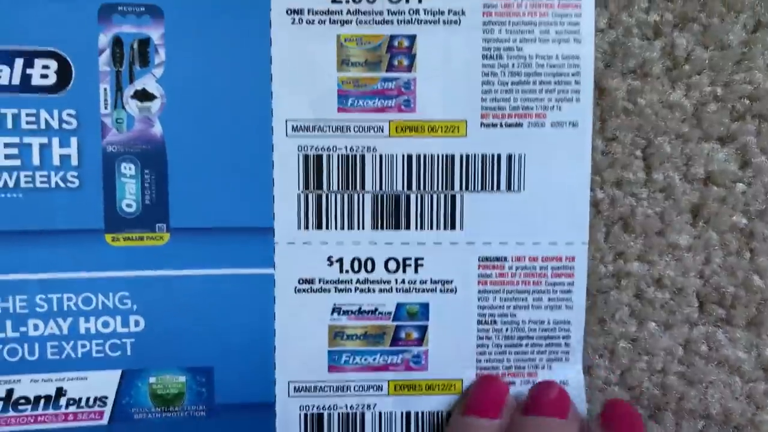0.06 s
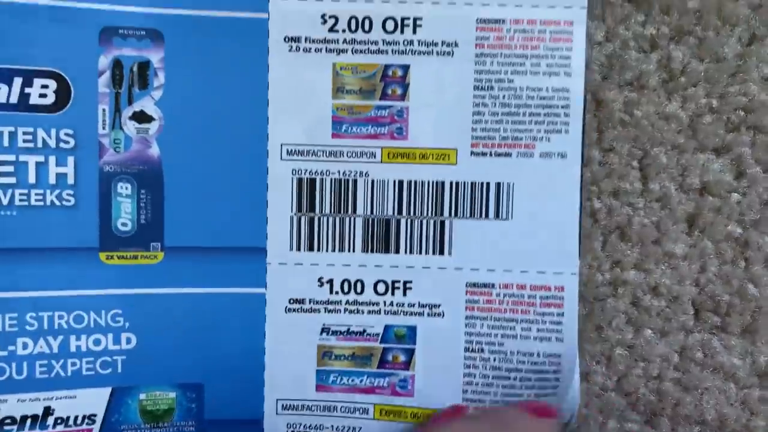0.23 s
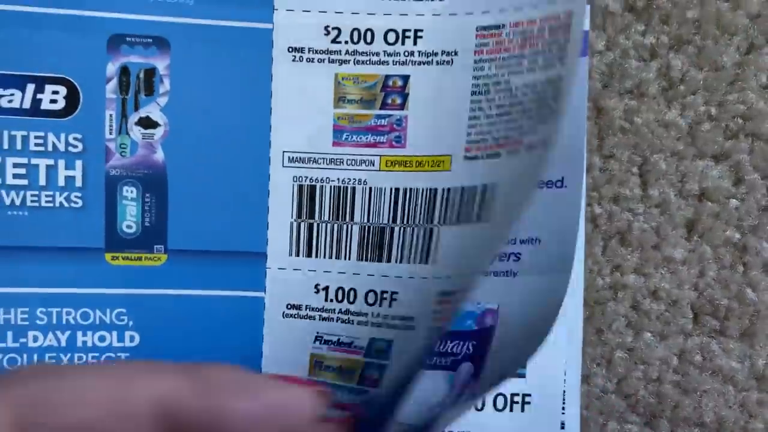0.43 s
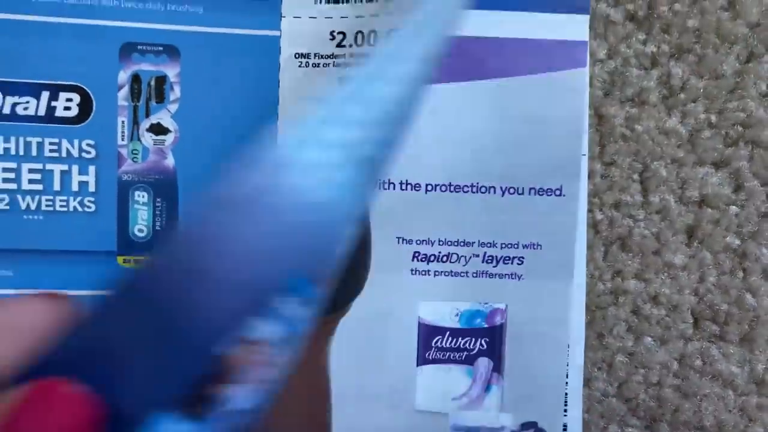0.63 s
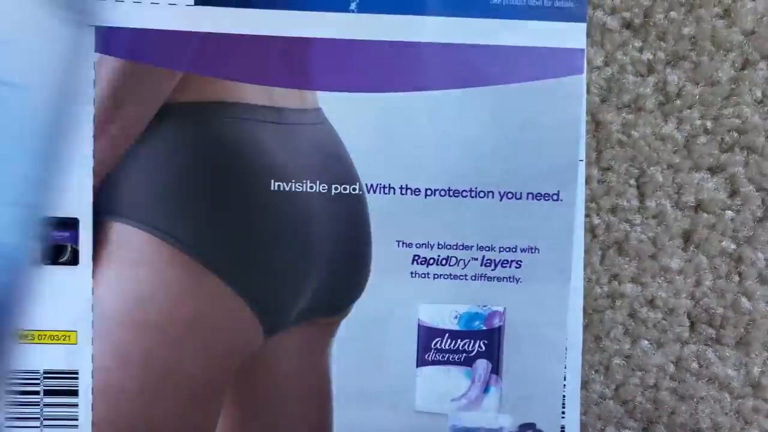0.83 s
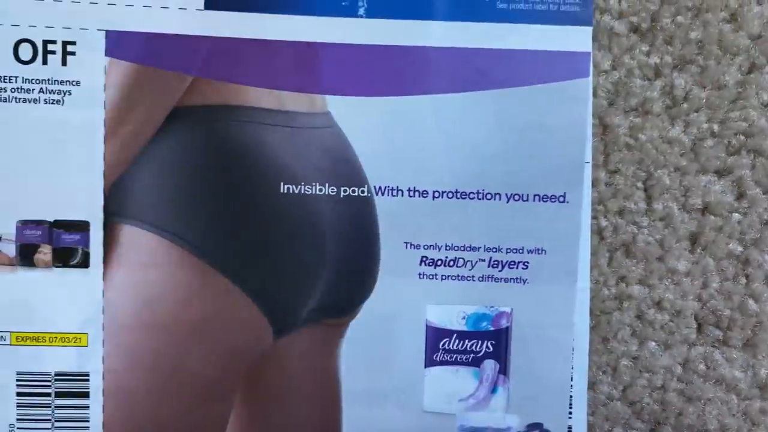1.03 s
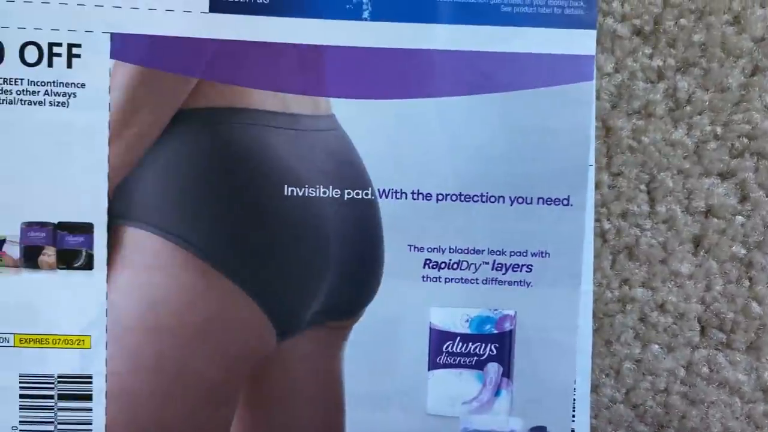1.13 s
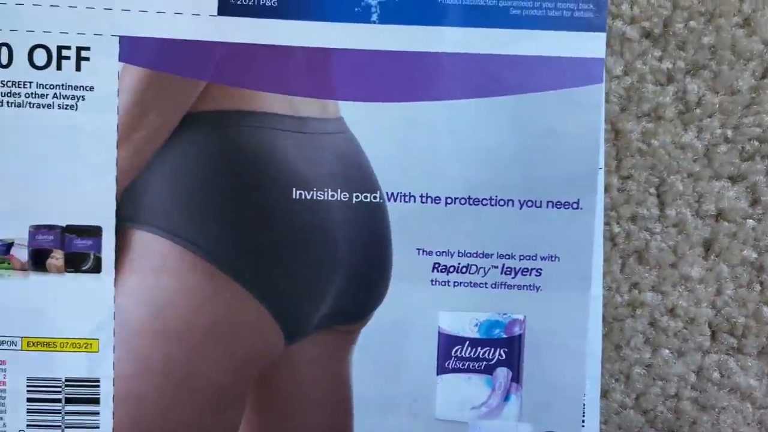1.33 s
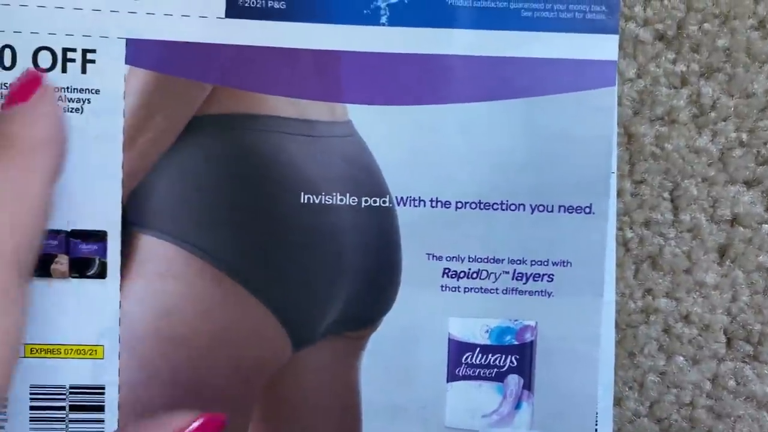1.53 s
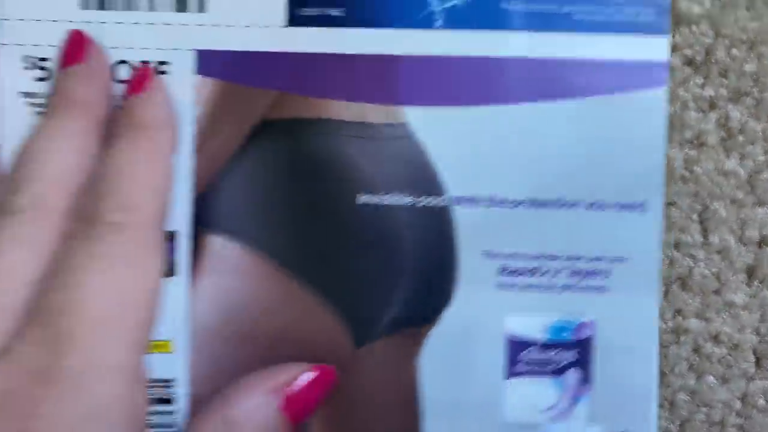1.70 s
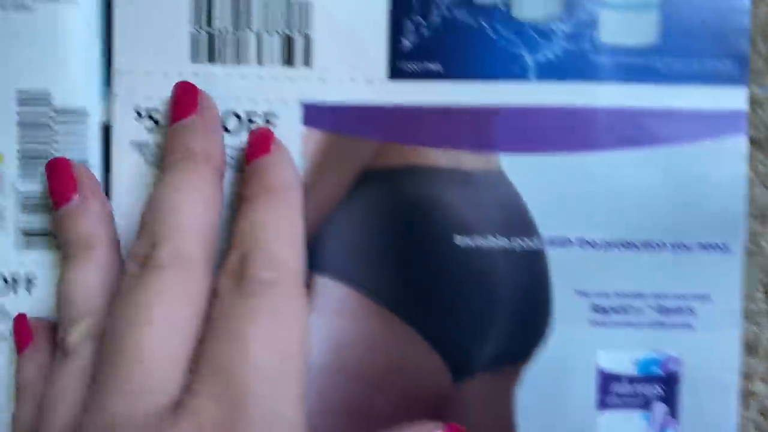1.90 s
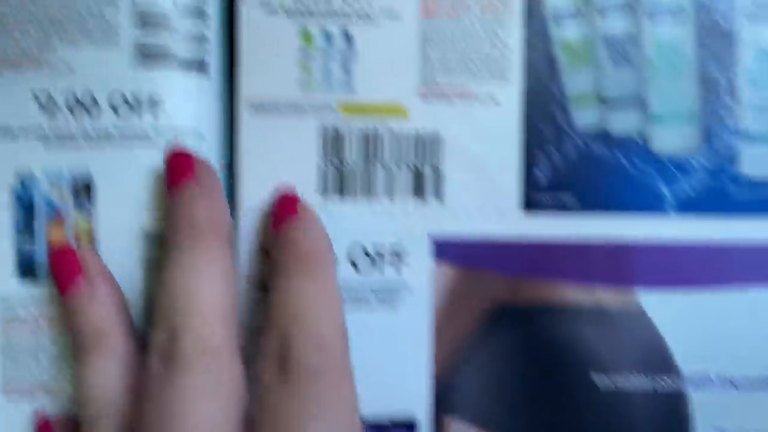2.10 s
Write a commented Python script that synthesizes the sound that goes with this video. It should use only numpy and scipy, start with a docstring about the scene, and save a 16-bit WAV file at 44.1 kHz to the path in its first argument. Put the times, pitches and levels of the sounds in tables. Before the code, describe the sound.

A glossy paper page slides and rustles as a hand lifts it, crackles as it flips over with soft puffs of air, then is smoothed and patted flat. Close to the microphone in a quiet room.

```python
"""Paper slides on paper and crackles as a hand lifts a glossy magazine page, close to a stereo microphone
in a quiet carpeted room. The hiss is fibres catching and slipping. As the sheet flips over it pushes
soft gusts of air and buckles, each snap sending out a bending wave that falls in pitch.
Then the page settles, and fingers smooth it flat and pat it down."""
import sys
import numpy as np
from scipy import signal
from scipy.fft import rfft, irfft, next_fast_len
from scipy.io import wavfile

SR = 44100
rng = np.random.default_rng(int(sys.argv[2]) if len(sys.argv) > 2 else 0)


def unload_audio(sound):
    """Save the sound as a 16-bit wav file, at the path given as the first command line argument."""
    columns = np.transpose(np.atleast_2d(sound))
    # keep every value between -1 and 1, then stretch to whole-number steps
    steps = np.round(np.clip(columns, -1, 1) * 32767)
    wavfile.write(sys.argv[1], SR, steps.astype(np.int16))


N = 94815
SIZE = next_fast_len(N + SR // 2)
TIME, FREQ = np.arange(N) / SR, np.maximum(np.fft.rfftfreq(SIZE, 1 / SR), 1)

# spectrum of the sheet's body: (frequency [Hz], relative level [dB])
SHEET_BODY = [(80, -0.5), (250, 3), (500, 1), (950, 4.5), (1500, -2.5), (2600, -6), (3400, -11.5),
              (6000, -17.5), (15000, -27)]


def from_db(db):
    """Decibels to gain."""
    return 10 ** (np.asarray(db) / 20)


def rms_one(x):
    """Scale to rms 1."""
    return x / np.sqrt(np.mean(x ** 2) + 1e-20)


def over_hz(points, at=FREQ):
    """A table joined by straight lines over log frequency."""
    hz, value = np.transpose(points)
    return np.interp(np.log(at), np.log(hz), value)


def colour(x, db):
    """Minimum-phase filter of the given shape; white noise keeps its power."""
    cepstrum = irfft(np.log(rms_one(from_db(db))), SIZE)
    cepstrum[1:SIZE // 2] *= 2
    cepstrum[SIZE // 2 + 1:] = 0
    return irfft(rfft(x, SIZE) * np.exp(rfft(cepstrum)), SIZE)[:N]


def butterworth(x, hz, kind="low", order=2):
    """Low-pass or high-pass filter."""
    return signal.sosfilt(signal.butter(order, hz, kind, fs=SR, output="sos"), x)


def noise():
    """White noise."""
    return rng.standard_normal(N)


def swell(peak_s, rise, fall):
    """A bell-shaped stroke with its own rise and fall."""
    distance = (TIME - peak_s) / np.where(TIME < peak_s, rise, fall)
    return np.exp(-.5 * np.minimum(distance ** 2, 100))


def dying(start, decay):
    """Sudden start, exponential decay."""
    return (TIME >= start) * np.exp(-np.clip((TIME - start) / decay, 0, 40))


def friction(clicks_per_s=2500, spread_db=5.5, click_share=.31):
    """Fibres catch and slip: tiny clicks of uneven size in a smooth hiss; rms 1."""
    sizes = from_db(spread_db * np.minimum(rng.exponential(1, N), 5)) * rng.choice([-1, 1], N)
    clicks = rms_one(sizes * (rng.random(N) < clicks_per_s / SR))
    return np.sqrt(click_share) * clicks + np.sqrt(1 - click_share) * noise()


def impact(start, decay):
    """One sharp impulse and a brief scatter of smaller ones."""
    out = .13 * noise() * dying(start, decay)
    out[int(start * SR)] += 1
    return out


def room_tone(level_db=-56.5):
    """The quiet room: a faint, steady rumble."""
    # room spectrum: (frequency [Hz], relative level [dB])
    spectrum = [(20, -7), (40, 3.5), (65, 5.5), (110, -1.5), (260, -14), (500, -33.5), (1500, -23),
                (5000, -31), (15500, -42)]
    return from_db(level_db) * colour(noise(), over_hz(spectrum))


def reflections(x, level_db=-11.5, t60_s=.16):
    """The carpeted room returns a short diffuse tail above the bass, different on each side."""
    tails = rng.standard_normal((2, N)) * dying(0, t60_s / np.log(1000))
    tails = from_db(level_db) * tails / np.sqrt(np.sum(tails ** 2, axis=1, keepdims=True))
    return signal.fftconvolve(butterworth(x, 300, "high")[None], tails, axes=1)[:, :N]


def air_puffs():
    """The swinging page and the hand push soft, low gusts at the microphone."""
    # gusts: (peak time [s], rise [s], fall [s], level [dB], centre [Hz])
    gusts = [(0.021, 0.049, 0.077, -54, 57.5), (.065, 0.023, 0.03, -50, 146), (.51, 0.018, 0.24, -49.5, 80),
             (.605, 0.012, .012, -46.5, 188), (.77, 0.04, 0.028, -46, 190), (.82, 0.027, 0.022, -38, 110.5),
             (.96, 0.079, 0.054, -36, 91), (1.05, 0.036, 0.02, -43.5, 72), (1.14, 0.037, 0.01, -44, 86),
             (1.134, 0.029, 0.0071, -47.5, 277), (1.27, 0.077, 0.18, -50, 71),
             (1.52, 0.047, 0.055, -52.5, 61), (1.55, 0.31, 0.2, -59, 242), (1.71, 0.041, 0.14, -47.5, 64),
             (1.792, 0.01, 0.02, -42.5, 420)]
    # gust spectrum: (frequency [multiple of the centre], relative level [dB])
    spectrum = [(.3, -14.5), (.65, -7.5), (1, 4.5), (1.8, -8.5), (3.5, -15), (7, -27.5), (20, -61),
                (200, -100)]
    return sum(from_db(db) * swell(peak_s, rise, fall) * colour(noise(), over_hz(spectrum, FREQ / hz))
               for peak_s, rise, fall, db, hz in gusts)


def sheet_ring(centre_hz=2750, half_width_hz=290):
    """Rubbing excites one broad resonance of the flat-lying page."""
    # swells of the ring: (peak time [s], rise [s], fall [s], level [dB])
    rings = [(1.01, 0.086, 0.16, -48.5), (1.44, 0.066, 0.14, -59.5), (1.7, 0.02, 0.033, -57)]
    level = sum(from_db(db) * swell(peak_s, rise, fall) for peak_s, rise, fall, db in rings)
    resonance_db = -20 * np.log10(1 + ((FREQ - centre_hz) / half_width_hz) ** 2)
    return level * colour(friction(), resonance_db)


def edge_scrapes(fade_s=.0035):
    """An edge scrapes the page below; its band of hiss glides down as the gap opens."""
    # scrapes: (time [s], length [s], level [dB], from [Hz], to [Hz], half-width [Hz])
    scrapes = [(0.35, 0.031, -38, 14960, 8150, 2000), (0.577, 0.0086, -35, 4826, 4310, 248),
               (1.179, 0.0098, -42.5, 4230, 3830, 600)]
    out = 0
    for start, length, db, from_hz, to_hz, half_width_hz in scrapes:
        hz = np.exp(np.interp(TIME, [start, start + length], np.log([from_hz, to_hz])))
        band = butterworth([noise(), noise()], half_width_hz) * np.cos(2 * np.pi * np.cumsum(hz) / SR)
        contact = np.clip(np.minimum(TIME - start, start + length - TIME) / fade_s + .5, 0, 1)
        out = out + from_db(db) * contact * rms_one(band)
    return out


def finger_pats():
    """Fingertips slap the loose page onto the pile; a softer contact is duller."""
    # pats: (time [s], level [dB], scatter decay [s], dull above [Hz])
    pats = [(.0632, -20.5, 0.0013, 1170), (.6, -19.5, 0.0028, 2300), (0.9226, -7.5, 0.0015, 1210),
            (1.231, -29, 0.033, 3000), (1.7616, -15.5, 0.003, 2200), (1.7728, -9, 0.00075, 9200),
            (1.7735, -2.5, 0.0011, 11800), (1.784, -14.5, 0.012, 880), (1.797, -20, 0.0086, 1000)]
    # pat spectrum: (frequency [Hz], relative level [dB])
    spectrum = [(100, -1.5), (400, -3.5), (950, 8.5), (1700, 0.5), (2300, -2), (2700, 8), (3150, -3.5),
                (3900, -16), (5300, -7.5), (7000, -16.5), (10000, -28), (15500, -22)]
    blows = sum(from_db(db) * butterworth(impact(start, decay), dull_hz)
                for start, db, decay, dull_hz in pats)
    return colour(blows, over_hz(spectrum))


def crease_crackles(tail_db=-9.5, tail_s=.0021, ring_db=-2.5, ring_q=5.2):
    """Creases give way in dense bursts of tiny cracks, each burst with its own resonance."""
    # bursts: (time [s], length [s], level [dB], ring [Hz])
    bursts = [(0.2878, 0.0016, -22, 4470), (0.371, 0.0064, -35.5, 9000), (0.3826, 0.0028, -26, 5100),
              (0.46, 0.008, -36, 7550), (0.465, 0.0025, -23, 5350), (0.567, 0.0032, -31, 4970),
              (0.599, .004, -35.5, 1700), (0.749, 0.0013, -37, 3980), (0.78, 0.0015, -42, 7000),
              (0.785, 0.0018, -45, 7000), (0.9609, 0.0033, -24.5, 4460), (1.027, 0.003, -33.5, 6100),
              (1.407, 0.0025, -41.5, 6950)]
    # crackle spectrum: (frequency [Hz], relative level [dB])
    spectrum = [(200, -9), (700, -3.5), (1500, 3.5), (2600, 1.5), (4200, 5), (6000, 3.5), (8000, 6.5),
                (11000, -10.5), (15500, -8.5)]
    out = 0
    for start, length, db, ring_hz in bursts:
        burst = swell(start + length / 2, length / 3, length / 3)
        tail = from_db(tail_db) * dying(start + length, tail_s)
        cracks = from_db(db) * (burst + tail) * np.array([noise(), noise()])
        ring = signal.lfilter(*signal.iirpeak(ring_hz, ring_q, fs=SR), cracks)
        out = out + cracks + from_db(ring_db) * ring
    return np.array([colour(side, over_hz(spectrum)) for side in out])


def paper_slides(peak_db=4, peak_octaves=.24, ripple_step_hz=170.1, ripple_hold_s=.07):
    """Paper slides on paper or under the hand, hissing and shaking the sheet; gives near and wide sound."""
    # strokes: (peak time [s], rise [s], fall [s], hiss [dB], body [dB], hiss peak [Hz], tilt [dB/octave])
    strokes = [(.015, 0.059, 0.034, -52, -59.5, 6000, 1), (0.129, 0.022, 0.043, -49.5, -51.5, 4000, -1.5),
               (.228, 0.038, 0.043, -41, -53.5, 5200, 1), (.31, 0.046, 0.077, -42, -52.5, 4200, -2.5),
               (.385, 0.026, 0.018, -46, -45.5, 4500, 10), (.48, 0.047, 0.073, -42, -46.5, 5200, -0.5),
               (0.579, 0.0075, 0.0026, -35, -61, 4500, -1), (.65, 0.021, 0.03, -36.5, -63, 4200, 1),
               (.705, 0.024, 0.039, -40, -68, 7500, -1.5), (.808, 0.011, 0.015, -42.5, -45.5, 7300, -4.5),
               (.848, 0.0067, 0.019, -40, -45, 6100, -2.5), (0.902, 0.0072, 0.013, -40.5, -40, 5500, -4.5),
               (.966, 0.013, 0.029, -41.5, -39, 4500, -6), (1.004, 0.012, 0.074, -47, -43, 6500, -1),
               (1.15, 0.033, 0.044, -44.5, -44.5, 7400, 1), (1.235, 0.012, 0.023, -53, -36, 4200, -11),
               (1.29, 0.067, 0.027, -87, -46.5, 3000, -14.5), (1.36, 0.023, 0.024, -51, -57, 7500, 0),
               (1.412, 0.0073, 0.042, -48.5, -46, 7000, 0), (1.53, 0.082, 0.22, -55.5, -73, 7000, -2),
               (1.696, 0.016, 0.21, -53.5, -60, 5200, -0.5), (1.782, 0.015, 0.027, -46.5, -46.5, 7000, -5),
               (1.84, 0.065, 0.054, -57.5, -54.5, 7200, 6), (1.992, 0.026, 0.021, -54.5, -52, 7200, -1),
               (2.1, 0.092, 0.071, -58, -82, 3900, -1.5)]
    # surface hiss: (frequency [Hz], relative level [dB])
    hiss_spectrum = [(200, -10), (700, -10.5), (1500, -1), (2600, -6), (4000, 1.5), (6000, -3.5), (8200, 4),
                     (10500, -3.5), (12500, -4), (15500, -7)]
    # hiss from the page's whole width: (frequency [Hz], level against the near hiss [dB])
    wide_spectrum = [(1000, -3.5), (2500, 0.5), (8000, -4), (11500, -1.5)]
    # lifted, the body sounds all over; laid down, at the rubbed spot: (time [s], wide share [0-1])
    body_width = [(.55, 0.83), (.64, 0.04)]
    hiss, body_power = np.zeros((3, N)), np.zeros(N)  # hiss rows: near, wide left, wide right
    rubbing = [np.array([friction(), friction(), friction()]) for _ in range(2)]
    for k, (peak_s, rise, fall, hiss_db, body_db, peak_hz, tilt_db) in enumerate(strokes):
        stroke = swell(peak_s, rise, fall)
        span = np.flatnonzero(stroke > .003)
        size = next_fast_len(len(span))
        hz = np.maximum(np.fft.rfftfreq(size, 1 / SR), 100)
        octaves = np.log2(hz / peak_hz)
        peak = peak_db * np.exp(-.5 * (octaves / peak_octaves) ** 2)
        # each bend of the page colours the hiss differently; long strokes average it out
        ripple_db = 4.5 * ripple_hold_s / (ripple_hold_s + rise + fall)
        ripple = ripple_db * np.interp(hz / ripple_step_hz, np.arange(256), rng.standard_normal(256))
        near_gain = rms_one(from_db(over_hz(hiss_spectrum, hz) + ripple + tilt_db * octaves + peak))
        wide_gain = near_gain * from_db(over_hz(wide_spectrum, hz))
        spectra = rfft(rubbing[k % 2][:, span], size) * np.array([near_gain, wide_gain, wide_gain])
        hiss[:, span] += from_db(hiss_db) * stroke[span] * irfft(spectra, size)[:, :len(span)]
        body_power += (from_db(body_db) * stroke) ** 2
    wide_share = np.interp(TIME, *np.transpose(body_width))
    near, left, right = [np.sqrt(body_power * share) * colour(friction(), over_hz(SHEET_BODY))
                         for share in (1 - wide_share, wide_share, wide_share)]
    return hiss[0] + near, hiss[1:] + [left, right]


def sheet_buckles(snap_s=.0014, rise_s=.00064, glide_cycles=1.21, roughness=.14):
    """A snap, then a bending wave whose high notes arrive first: its pitch falls as one over time."""
    # buckles: (time [s], wave level [dB], snap level [dB], starting pitch [Hz], wave decay [s])
    buckles = [(0.6015, -32, -52, 637, 0.0062), (0.7493, -33.5, -28, 450, 0.018),
               (0.8059, -27, -15.5, 496, 0.017), (.826, -29, -26, 368, 0.027),
               (0.8419, -34.5, -18.5, 493, 0.018), (0.8948, -24, -9.5, 760, 0.02),
               (0.9222, -25, -30, 884, 0.025), (0.9432, -24, -5, 960, 0.018),
               (0.9627, -14.5, -6.5, 940, 0.0054), (0.9931, -20.5, -8, 643, 0.017),
               (1.0303, -27.5, -11.5, 613, 0.027)]
    # snap spectrum: (frequency [Hz], relative level [dB])
    snap_spectrum = [(150, 8.5), (500, 6.5), (1000, 5), (1600, 2.5), (2700, 2.5), (4000, -3.5), (7500, -13),
                     (11000, -14), (15500, -22)]
    waves, snaps = 0, 0
    for start, wave_db, snap_db, start_hz, decay in buckles:
        age = np.maximum(TIME - start, 0)
        phase = 2 * np.pi * glide_cycles * np.log1p(age * start_hz / glide_cycles)
        envelope = (1 - np.exp(-age / rise_s)) * dying(start, decay)
        waves = waves + from_db(wave_db) * envelope * np.cos(phase)
        snaps = snaps + from_db(snap_db) * impact(start, snap_s)
    flutter = 1 + roughness * colour(noise(), over_hz(SHEET_BODY))
    return waves * flutter + colour(snaps, over_hz(snap_spectrum))


def microphone_ports(near, wide, bass_hz=288):
    """The two ports differ in phase and level; wide sound is alike in both only in the high treble."""
    # phase between ports: (frequency [Hz], left lead before the bass fade [rad])
    phase_lead = [(330, 1.5), (480, 2), (750, 2), (1050, 2), (1600, 3.5), (2600, 7), (3700, 8.5),
                  (5200, 7.5), (6500, 6.5), (8300, 3.5), (10800, 0), (13300, -3), (15600, -5.5)]
    # balance: (frequency [Hz], left minus right [dB])
    balance = [(140, 2), (280, -7), (450, -0.5), (800, 4.5), (1300, 1.5), (2000, -0.5), (2600, -3),
               (3800, 6), (5500, 4.5), (7000, -1), (8300, -4.5), (10000, 0)]
    # wide sound at the two ports: (frequency [Hz], likeness [0-1])
    likeness = [(3000, 0), (9000, 0.01), (10500, 0.85)]
    left, right = rfft(wide, SIZE)
    alike = over_hz(likeness)
    both = rfft(near, SIZE) + np.array([left, alike * left + np.sqrt(1 - alike ** 2) * right])
    bass_fade = 1 / (1 + (bass_hz / FREQ) ** 4)  # bass reaches both ports in step
    left_gain = from_db(over_hz(balance) / 2) * np.exp(.5j * bass_fade * over_hz(phase_lead))
    return irfft(both * np.array([left_gain, 1 / left_gain]), SIZE)[:, :N]


def scene():
    """The page close to the microphone, sounding from one spot and from its whole width, in the room."""
    near, wide = paper_slides()
    page = near + sheet_ring() + sheet_buckles() + finger_pats()
    wide = wide + crease_crackles() + edge_scrapes()
    air = air_puffs() + room_tone()
    return microphone_ports(page + air, wide + reflections(page + wide[0]))


def record(dry, low_cut_hz=41, top_hz=16000):
    """The microphone's low cut thins the deep bass, and the top is cut steeply."""
    thinned = butterworth(dry, low_cut_hz, "high", order=5)
    return signal.sosfilt(signal.ellip(10, .1, 80, top_hz, fs=SR, output="sos"), thinned)


dry = scene()
out = record(dry)
unload_audio(out)
```